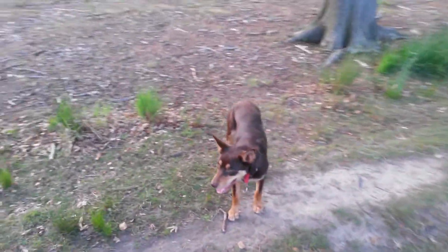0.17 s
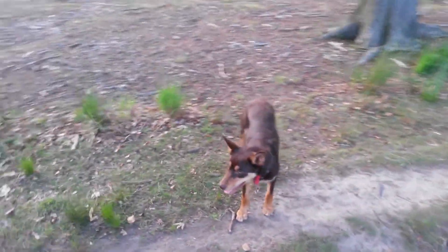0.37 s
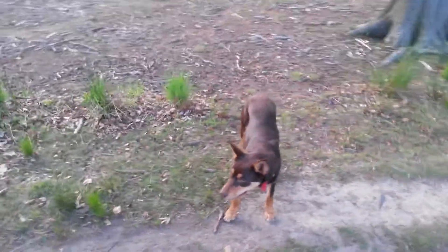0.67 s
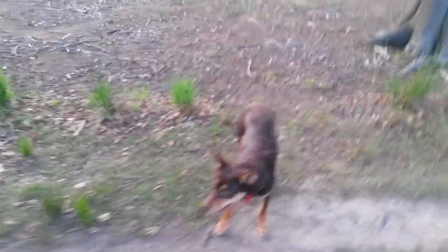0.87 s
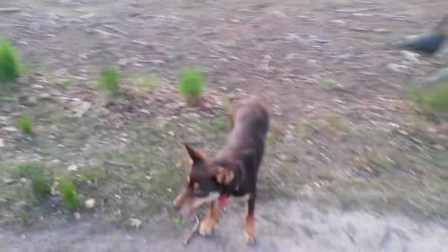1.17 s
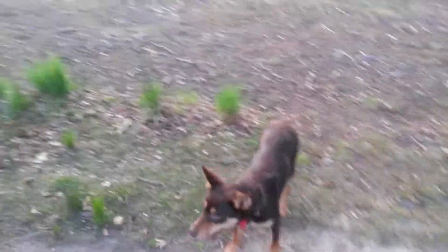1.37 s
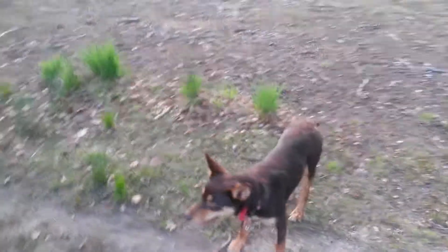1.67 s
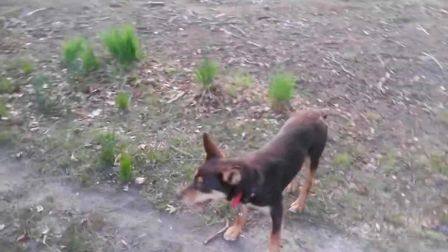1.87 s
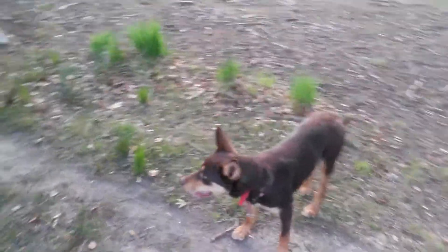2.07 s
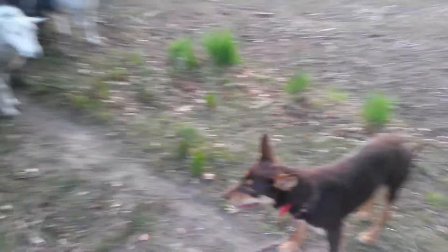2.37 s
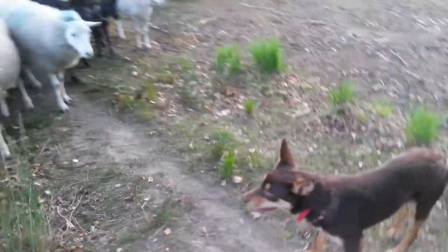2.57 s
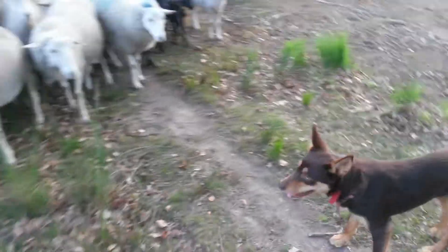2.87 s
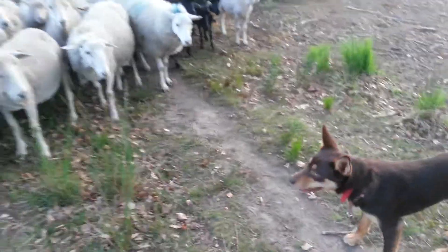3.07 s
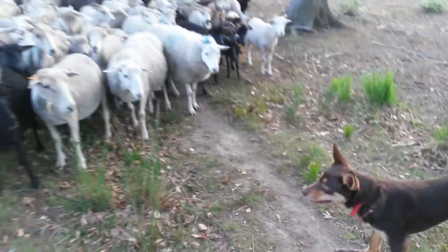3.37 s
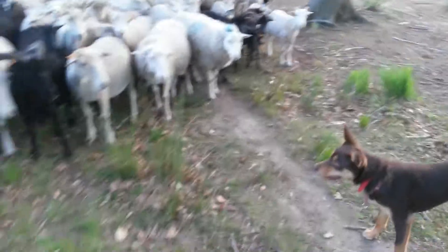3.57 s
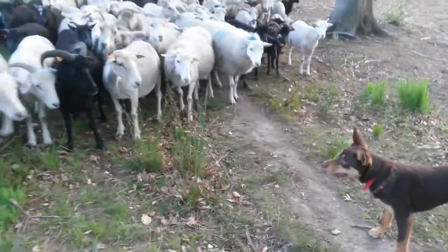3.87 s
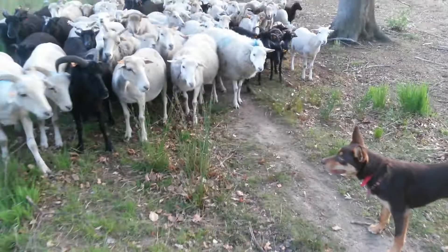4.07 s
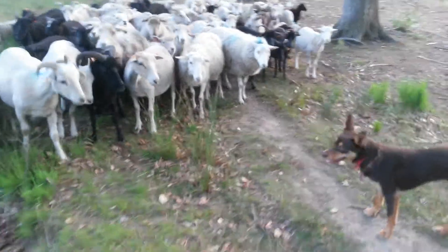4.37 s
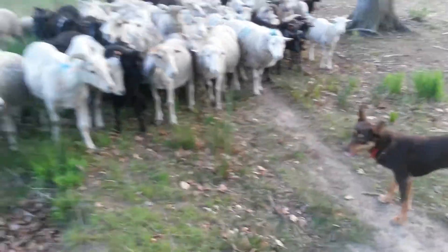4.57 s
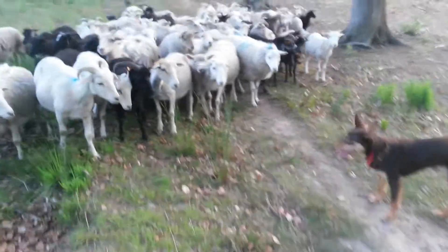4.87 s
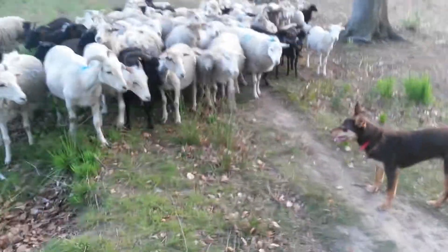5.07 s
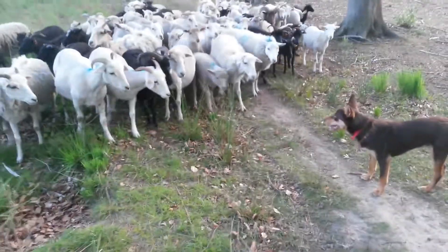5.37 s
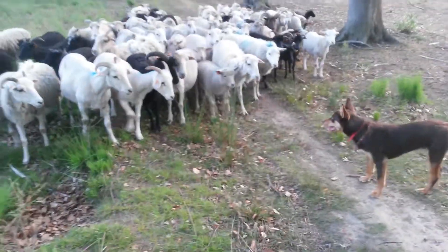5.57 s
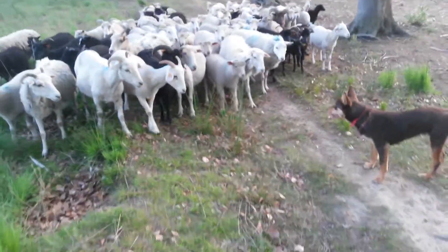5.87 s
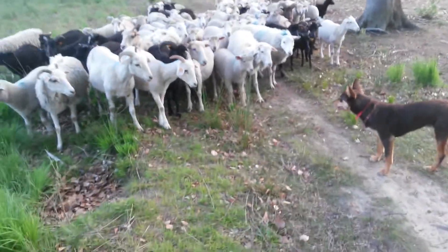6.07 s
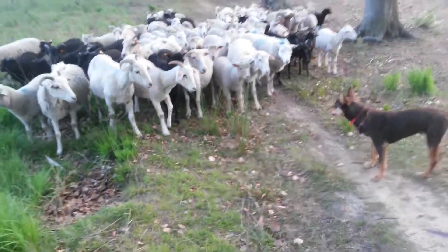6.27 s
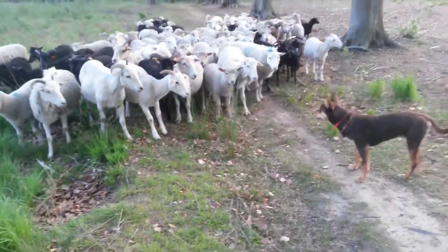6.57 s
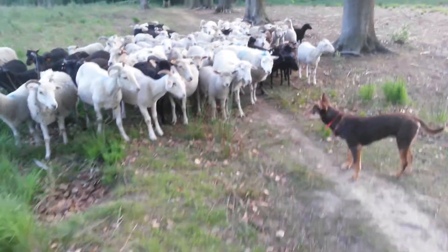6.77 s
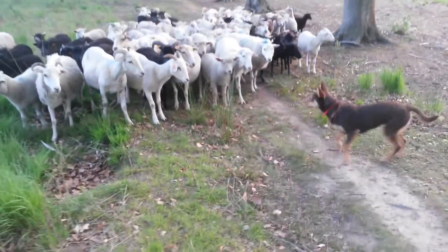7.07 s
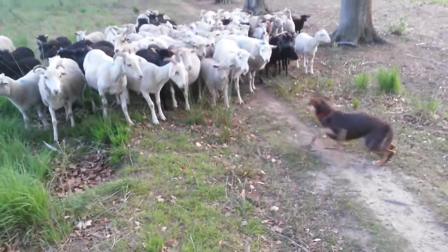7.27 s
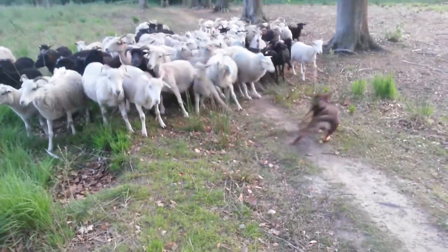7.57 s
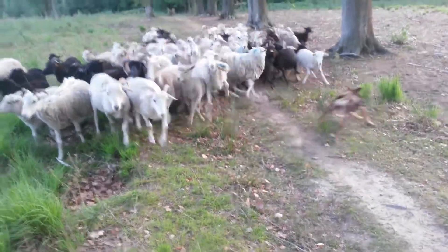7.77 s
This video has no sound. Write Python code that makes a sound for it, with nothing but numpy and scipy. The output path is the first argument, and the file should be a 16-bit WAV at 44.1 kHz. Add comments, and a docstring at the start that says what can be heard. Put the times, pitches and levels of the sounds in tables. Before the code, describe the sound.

Outdoors among trees, a flock treads on dry leaf litter: crackling rustle, sharp twig snaps, brief hoof scrapes and dull woody knocks. It starts busy and right-sided, then becomes sparse and more central as the microphone turns towards the animals. One sheep hums into a low trembling bleat, followed by tiny faint calls, a few hard knocks and a renewed rustle. A dim hush and low wind bumps lie beneath.

```python
"""On a woodland track a flock of sheep shuffles through dry leaves, heard at two microphone ports.
Leaves and twigs are noise bursts shaped by port resonances; scrapes are gliding noise bands, knocks damped modes.
One sheep hums, then gives a low, quavering bleat: harmonics through throat resonances. Faint calls,
soft blips, trampling and a breeze are tones, pulses and coloured noise. The camera turns to face the flock."""
import sys
import numpy as np
from scipy import signal
from scipy.fft import rfft, irfft
from scipy.io import wavfile
from scipy.ndimage import uniform_filter1d

SR = 44100
rng = np.random.default_rng(int(sys.argv[2]) if len(sys.argv) > 2 else 0)


def put_to_file(sound):
    """Save the sound as 16-bit audio at rate SR, in the file named by the first command-line argument."""
    columns = np.atleast_2d(sound).T  # one column per channel
    safe = np.clip(columns, -1, 1)
    whole_steps = np.round(safe * 32767)
    wavfile.write(sys.argv[1], SR, whole_steps.astype(np.int16))


N = 348831
TIME = np.arange(N) / SR
PORT_DELAY_S = .00043  # longest lag of the left port, for sound from the right

# direction of the flock, to the right of straight ahead: t/s, angle/rad
FLOCK_BEARING = [(0, 0.91), (.5, 1.04), (2.3, 1.16), (3.4, 1.03), (4.1, 0.77), (4.6, 0.24), (6.4, 0.21),
                 (7.91, 0.31)]


def gain_of(db):
    """Level law: converts decibels to an amplitude ratio."""
    return 10 ** (np.asarray(db) / 20)


def evened(x):
    """Normalisation: scales to an rms of one."""
    return x / np.sqrt(np.mean(x ** 2) + 1e-20)


def follow(rows, t=TIME):
    """Linear interpolation: the columns of a curve table at times t."""
    s, *columns = np.transpose(rows)
    return [np.interp(t, s, c) for c in columns]


def read(points, hz):
    """Interpolation of a spectrum table on a logarithmic frequency axis."""
    f, value = np.transpose(points)
    return np.interp(np.log(hz + 1), np.log(f + 1), value)


def add(mix, s, sound):
    """Superposition: mixes a sound in at time s."""
    part = mix[..., max(round(s * SR), 0):][..., :sound.shape[-1]]
    part += sound[..., :part.shape[-1]]


def coloured(x, db_at):
    """Minimum-phase filtering: a causal filter whose gain in dB is db_at(Hz)."""
    size = 4096
    log_gain = np.log(gain_of(db_at(abs(np.fft.fftfreq(size, 1 / SR)))))
    # the Hilbert transform of the log gain gives the phase
    response = np.exp(np.conj(signal.hilbert(log_gain)))
    taps = np.fft.ifft(response).real[..., :size // 2]
    return signal.oaconvolve(np.atleast_2d(x), np.atleast_2d(taps), axes=1)[:, :x.shape[-1]]


def wander(rate_hz, count=N):
    """Low-pass filtered noise: a smooth random drift of rms one."""
    hz = np.fft.rfftfreq(2 * N, 1 / SR)
    slow = rfft(rng.standard_normal(2 * N)) / (1 + (hz / rate_hz) ** 4)
    return evened(irfft(slow)[:count])


def grains(per_s, spread_db):
    """Random impulse train: clicks at chance instants, most small and a few large."""
    size = gain_of(spread_db * np.minimum(rng.exponential(1, N), 4.5))
    sign = rng.choice([-1, 1], N)
    return evened(size * sign * (rng.random(N) < per_s / SR))


def swells(rows):
    """Addition of power: smooth swells given as (t/s at the middle, level/dB, half-height length/s)."""
    power = np.zeros(N)
    for s, db, length in rows:
        add(power, s - length, gain_of(2 * db) * signal.windows.hann(int(2 * length * SR)))
    return power


def peaks(modes, hz):
    """Resonance: summed amplitude response of modes given as (f/Hz, width/Hz, level/dB)."""
    return sum(gain_of(db) / (1 + (2 * (hz - f) / width) ** 2) for f, width, db in modes)


def scattered(x, t60, wet_db):
    """Scattering: ground, legs and trunks return a short decaying tail, unlike at the two ports."""
    t = np.arange(SR // 4) / SR
    tail = rng.standard_normal((2, len(t))) * gain_of(-60 * t / t60)
    tail /= np.linalg.norm(tail, axis=1, keepdims=True)
    return x + gain_of(wet_db) * signal.oaconvolve(x, tail, axes=1)[:, :x.shape[1]]


def diffuse(clicks, t60, wet_db):
    """Diffuse decay: every click trails its own short puff of noise, unlike at the two ports."""
    r = np.exp(-2 * np.log(1000) / (t60 * SR))
    power = signal.lfilter([1 - r], [1, -r], clicks ** 2)
    return clicks + gain_of(wet_db) * np.sqrt(power) * rng.standard_normal(clicks.shape)


def dappled(x, depth_db, size, frames_count, bins_count, below_hz=np.inf):
    """Time-varying spectrum: brief random patches tint the sound, as no two leaves or footfalls are alike."""
    overlap = size * 3 // 4
    hz, _, z = signal.stft(x, SR, nperseg=size, noverlap=overlap)
    patches = uniform_filter1d(rng.standard_normal(z.shape[1:]), bins_count, axis=0)
    patches = uniform_filter1d(patches, frames_count, axis=1)
    tint_db = depth_db * evened(patches) / (1 + (hz[:, None] / below_hz) ** 2)
    tinted = signal.istft(z * gain_of(tint_db), nperseg=size, noverlap=overlap)[1]
    return evened(tinted[:, :N])


def leaf_db(hz):
    """Source and receiver: the spectrum of a breaking leaf plus the resonances of each port, in dB."""
    # spectrum of a breaking dry leaf: f/Hz, level/dB
    dry_leaf = [(100, -38), (300, -11), (700, -11.5), (1050, -10.5), (2000, -13.5), (3000, -7.5),
                (4000, -7.5), (5000, -3.5), (7500, -0.5), (9000, -1), (11000, -3), (14500, -7)]
    # resonances (dips if negative) of the left, then the right port: f/Hz, width/Hz, level/dB
    left_port = [(1708, 850, 12), (2220, 400, -7.5), (2710, 680, 5), (4360, 500, 0.5), (5570, 680, 5.5),
                 (7100, 1200, 11), (7980, 430, 3), (11400, 4000, -3), (12600, 1500, 0), (15000, 1400, -22)]
    right_port = [(1800, 4400, -5), (8200, 1980, 10.5)]
    ports = [sum(db / (1 + (2 * (hz - f) / width) ** 2) for f, width, db in port)
             for port in (left_port, right_port)]
    return read(dry_leaf, hz) + np.array(ports)


def crackle(per_s, spread_db, crush_db, flock_angle):
    """Fracture: a leaf gives way at once and crackles on briefly; cracks reach the left port later."""
    crushes_per_s, crush_decay_s = 260, .002
    crush_size = gain_of(crush_db * np.clip(rng.standard_normal(N), -2, 2))
    crushes = crush_size * (rng.random(N) < crushes_per_s / SR)
    crushing = signal.lfilter([1], [1, -np.exp(-1 / (crush_decay_s * SR))], crushes ** 2)
    # the constant keeps some cracks going between crushes
    cracks = grains(per_s, spread_db) * np.sqrt(crushing / crushing.mean() + 3.0)

    angle = follow(FLOCK_BEARING)[0] + flock_angle * rng.standard_normal(N)
    lag = np.round(PORT_DELAY_S * SR * np.sin(angle)).astype(int)
    arrival = np.clip(np.arange(N) + lag, 0, N - 1)
    pair = np.array([np.bincount(arrival, cracks, N), cracks])
    pair = diffuse(pair, t60=.022, wet_db=-5.5)
    return dappled(coloured(pair, leaf_db), depth_db=1.5, size=256, frames_count=10, bins_count=5)


def leaves():
    """Granular noise: steps swell out of the general rustle, with a coarser crunch in the heavy ones."""
    # steady shuffling of the restless flock: t/s, relative level/dB
    shuffling = [(0, -18), (.25, -20), (.34, -24), (.85, -28.5), (1.06, -30), (1.28, -29), (1.42, -27),
                 (1.95, -32.5), (2.15, -28), (2.9, -37.5), (3.6, -34), (4.2, -32.5), (4.9, -40), (5.1, -37),
                 (5.27, -35.5), (5.52, -26.5), (5.9, -42.5), (6.35, -38), (7.0, -46.5), (7.28, -40.5),
                 (7.5, -35), (7.91, -25)]
    # clearest steps: middle t/s, relative level/dB, half-height length/s, coarse part against level/dB
    steps = [(0.128, -16, 0.017, -8), (0.17, -29.5, 0.037, 18), (0.384, -16.5, 0.032, -19),
             (0.453, -16.5, 0.039, -25), (0.56, -21, 0.078, -15), (0.646, -14.5, 0.035, -5),
             (0.707, -17, 0.12, -5), (0.907, -21, 0.053, -12), (1.018, -21, 0.025, -10),
             (1.129, -18.5, 0.034, 1), (1.202, -18.5, 0.026, 1.5), (1.363, -20.5, 0.083, -17),
             (1.547, -17, 0.04, -13), (1.602, -24.5, 0.046, -9), (1.657, -22, 0.018, -10),
             (1.752, -21.5, 0.056, -8), (1.856, -21, 0.065, 5), (2.009, -22.5, 0.028, -3),
             (2.252, -19.5, 0.025, 5.5), (2.354, -26, 0.087, 6), (2.532, -25.5, 0.045, 3.5),
             (2.72, -27.5, 0.012, 5), (2.995, -29.5, 0.044, 6.5), (3.165, -29.5, 0.12, -13),
             (3.401, -28.5, 0.033, 5), (3.678, -28.5, 0.04, 0), (3.723, -22, 0.033, 3),
             (3.787, -26.5, 0.033, 4), (3.841, -22.5, 0.04, -4), (3.927, -26, 0.059, -4),
             (4.044, -24, 0.028, -16), (4.148, -21.5, 0.092, -15), (4.247, -29.5, 0.015, -5),
             (4.369, -21.5, 0.038, -16), (4.503, -30.5, 0.052, -2), (4.651, -29.5, 0.13, 10),
             (4.729, -28, 0.036, 4.5), (4.878, -32, 0.022, 5), (4.936, -30, 0.052, 7),
             (5.41, -25, 0.03, 7.5), (5.593, -38.5, 0.035, 17.5), (5.729, -40, 0.055, 15),
             (5.826, -35.5, 0.039, 6), (6.21, -31, 0.031, -2), (6.606, -24, 0.014, -13),
             (7.409, -25.5, 0.1, 4.5), (7.575, -27.5, 0.064, 4.5), (7.694, -25, 0.019, 2),
             (7.815, -23.5, 0.079, 2)]
    # shading of sound from the right, left minus right (applied at 95 %): f/Hz, level/dB
    shadow = [(1000, -9), (4000, -5.5), (7000, -8), (8500, -6.5), (11000, -15.5), (15000, -1)]
    crunch = [(150, -1), (500, -17.0), (1500, 4.5), (4500, 7.5), (6000, 1.0), (8000, -7), (15000, -8.5)]  # f/Hz, level/dB

    step_power = swells((s, db, length) for s, db, length, _ in steps)
    coarse_power = swells((s, db + coarse_db, length) for s, db, length, coarse_db in steps)
    shuffle = gain_of(follow(shuffling)[0] + 1.16 * wander(15.0))

    fine = crackle(per_s=6500, spread_db=2.0, crush_db=2.5, flock_angle=.18)
    fine *= np.sqrt(shuffle ** 2 + gain_of(-6.0) * step_power)
    coarse = crackle(per_s=6200, spread_db=2.0, crush_db=-2.0, flock_angle=.3)
    coarse = evened(coloured(coarse, lambda hz: read(crunch, hz)))
    rustle = fine + gain_of(-13.5) * coarse * np.sqrt(coarse_power + 4.4 * shuffle ** 2)
    tinted = dappled(rustle, depth_db=3.0, size=512, frames_count=8, bins_count=3, below_hz=4900)
    rustle = tinted * rustle.std()

    # side-on, the camera body shades the left port and lifts the treble at the right one
    side_on = coloured(rustle, lambda hz: read(shadow, hz) * np.array([[.7], [-.25]]))
    turned = np.sin(follow(FLOCK_BEARING)[0]) ** 2
    return (1 - turned) * rustle + turned * side_on


def twigs(crack=2.1, ring_db=10.5, ring_octaves=0.42):
    """Impulsive fracture: a crack and briefly tearing fibres, with a ring and more body in thick twigs."""
    # snaps: t/s, level over 4 ms/dB, left minus right/dB, woody body below 5.5 kHz/dB,
    # tearing decay/s, ring f/Hz
    snaps = [(0.2657, -20, 7, 5, .0004, 6600), (0.293, -17, -4, 8, 0.00042, 7050),
             (.303, -17, 3, 7, .0006, 7000), (0.33, -26, 6, 3, .0004, 7200),
             (.337, -19.5, 0, 14, 0.00062, 6640), (0.527, -22.5, -10, -10, .0008, 7240),
             (.7122, -20.5, -6, 2, .0005, 6300), (.8877, -22, -10, -2, .0022, 7400),
             (.9672, -27, -10, -4, .0006, 8200), (.9928, -29, -14, -9, .0002, 12000),
             (1.0166, -26, -5, 0, .0006, 6600), (1.0645, -16.5, -3, 8, .0009, 6200),
             (1.2152, -28, -10, -6, .0003, 8200), (1.2417, -20.5, -3, 2, .0018, 9500),
             (1.2544, -20.5, -6, -4, .0005, 6800), (1.258, -21, -5, -8, .0004, 7700),
             (1.263, -19, -5, -8, .003, 7000), (1.2836, -21.5, -9, -8, .0009, 9700),
             (1.4547, -26, -10, -4, .0005, 8000), (1.524, -31, -10, -6, .0004, 9300),
             (1.86, -26, 3, -6, .0004, 6000), (1.970, -28, -4, -6, .0003, 7800),
             (2.1947, -24, 1, 2, .0014, 7000), (2.248, -23, -8, -3, .0008, 8000),
             (2.5735, -29, -6, -2, .0006, 7200), (2.6811, -15, 10, -10, .00022, 5400),
             (2.6844, -29.5, 3, -2, .0003, 6500), (2.757, -35, -8, -6, .0004, 8400),
             (2.8465, -32, -13, -6, .0003, 8800), (2.8675, -21.5, 1, 13.5, 0.00086, 7700),
             (2.9175, -29.5, -1, 14, 0.0015, 7040), (3.725, -28.5, -12, -9, 0.00044, 8600),
             (4.021, -25, -2, -8, .002, 7270), (4.028, -23, -5, -10, 0.003, 7200),
             (4.0341, -20.5, 0, -4, 0.00088, 7500), (4.256, -28, 0, 0, .001, 7200),
             (4.478, -31.5, 5, -2, .0007, 6600), (4.8588, -30, -5, -4, .0005, 9500),
             (4.862, -27, -5, 0, .0006, 7160), (4.8759, -30.5, -7, -3, .0002, 9500),
             (5.0252, -27, 2, 1, 0.0017, 6700), (5.0325, -27, -2, 2, 0.003, 8000),
             (5.116, -21.5, 0, 10, .0007, 6300), (5.2463, -31, -6, -2, .0004, 7200),
             (5.2764, -27, -7, -7, .001, 11000), (5.8215, -31, 0, -2, .0007, 7600),
             (5.9375, -35, 0, 6, .0012, 8000), (6.1933, -28, -2, 4, 0.00072, 7400),
             (6.557, -26, 0, -3, .0011, 6100), (6.601, -24, -4, 8, 0.0027, 10100),
             (6.7467, -36.5, 1, 13, .0011, 6700), (7.2343, -31.5, 2, 24, .0012, 6500),
             (7.2863, -34, 0, 12, .001, 7200), (7.6928, -24.5, -2, -4, .0007, 7300)]
    out, t = np.zeros((2, N)), np.arange(3000) / SR
    left_lag, level_span = round(PORT_DELAY_S * SR * .6), .004 * SR  # samples
    for s, db, pan_db, body_db, tear_s, ring_hz in snaps:
        fibres = rng.standard_normal((2, len(t))) * np.exp(-t / tear_s)
        fibres[:, 0] = crack
        fibres[0] = np.roll(fibres[0], left_lag)

        def snap_db(hz):
            """Spectral envelope: sum of leaf-like colour, ring and body in dB."""
            ring = ring_db * np.exp(-(np.log2((hz + 1) / ring_hz) / ring_octaves) ** 2)
            return 0.73 * leaf_db(hz) + ring + body_db / (1 + (hz / 5500) ** 4)

        snap = coloured(fibres, snap_db)
        snap *= np.sqrt(level_span) / np.linalg.norm(snap, axis=1, keepdims=True)
        add(out, s, snap * gain_of(db + np.array([[pan_db], [-pan_db]]) / 2))
    return scattered(out, t60=0.091, wet_db=-10)


def scrapes():
    """Friction noise: a hoof dragging through leaves hisses in one narrow, gliding band."""
    # drags: start t/s, end t/s, start f/Hz, end f/Hz, half-width/Hz, level/dB
    drags = [(0.24, 0.287, 4770, 5100, 140, -29), (1.843, 1.873, 4700, 4130, 500, -24),
             (1.986, 2.02, 5100, 4630, 300, -37), (2.011, 2.118, 3800, 4230, 400, -34.5),
             (2.061, 2.128, 2640, 2470, 80, -42), (2.078, 2.123, 4720, 5120, 120, -32.5)]
    out = np.zeros((2, N))
    for start, end, start_hz, end_hz, width_hz, db in drags:
        count = max(int((end - start) * SR), 100)
        # low-pass noise, shifted up to the gliding centre frequency
        turn = np.exp(2j * np.pi * np.cumsum(np.linspace(start_hz, end_hz, count)) / SR)
        noise = rng.standard_normal((2, count)) + 1j * rng.standard_normal((2, count))
        band = signal.lfilter(*signal.butter(2, width_hz, fs=SR), noise)
        add(out, start, gain_of(db) * evened((band * turn).real) * signal.windows.tukey(count, .7))
    return out


def hooves():
    """Modal vibration: each hard knock starts bright, as its high modes sound first, and sinks into low ones."""
    # knocks: t/s, peak level/dB, pitch factor, brightness per two octaves above 420 Hz/dB
    knocks = [(.734, -23, 1.22, 0), (0.745, -23, 0.95, 6), (0.786, -31, .96, -8), (0.824, -33, 0.87, -11),
              (.854, -31, 0.91, 3), (0.917, -31.5, 1.02, -8), (.993, -28.5, 0.65, 13),
              (1.21, -27, 0.96, -6), (1.76, -26, 2.17, -20), (1.781, -24.5, 2.47, -17),
              (1.785, -23, 0.94, -5), (1.952, -31, 0.43, 0), (2.192, -28, 1.1, 8), (2.351, -24, 0.94, 3),
              (2.866, -27, 1.03, 3.5), (4.1, -29, 1.7, -18), (4.118, -32.5, 1.04, -4),
              (4.913, -33.5, 0.82, -6), (5.408, -21.5, 1.98, 0), (5.451, -28.5, 1.44, -12),
              (5.716, -31, 1.75, -20), (5.763, -36, 0.32, 2), (5.817, -35.5, 0.365, -14),
              (6.327, -33.5, 0.7, -1), (6.3542, -22, 0.97, 2), (6.3718, -20, 1.1, 1),
              (6.3945, -24, 1.07, -3), (6.601, -25, 1.5, 2.5), (6.829, -31.5, 1.2, 6),
              (7.479, -32, 0.73, 2), (7.491, -28, 0.93, 25), (7.612, -32, 0.55, -17),
              (7.785, -34, 1.43, -9)]
    # modes at a pitch factor of one and neutral brightness: f/Hz, width/Hz, level/dB
    knock_modes = [(400, 151, 6), (743, 187, 2), (1140, 164, -5.5), (1490, 186, -2), (2710, 270, -12.5)]
    sag_cycles = 1.1  # each mode starts this many of its own cycles late
    out, t = np.zeros(N), np.arange(2500) / SR
    for s, db, pitch, bright_db in knocks:
        knock = np.zeros(len(t))
        for hz, width, mode_db in knock_modes:
            f = hz * pitch * rng.uniform(1.0, 1.05)
            age = np.maximum(t - sag_cycles / f, 0)
            envelope = np.exp(-np.pi * width * age) * (1 - np.exp(-age * f))
            gain = gain_of(mode_db + bright_db * np.log2(hz / 420) / 2)
            knock += gain * np.sin(2 * np.pi * f * age) * envelope
        add(out, s, gain_of(db) * knock / abs(knock).max())
    return scattered(np.array([out, out]), t60=0.11, wet_db=-15)


def bleat(depth=0.66, swell_db=4.0, sag=0.027, catch_sag=0.0121, rasp_db=-17):
    """Source-filter voice: hums open into a held call whose level and pitch quaver as the throat catches."""
    # throat resonances: f/Hz, width/Hz, level/dB
    throat = [(660.5, 90, 9.5), (1630, 170, -2), (2790, 300, -6.5), (3380, 300, -11), (5570, 300, -3)]
    # swells of the closed-mouth hum: middle t/s, level/dB, half-height length/s
    hums = [(5.035, -52.5, 0.047), (5.155, -45.5, 0.049), (5.23, -47.5, 0.029), (5.315, -47, 0.031)]
    # pitch before jitter and quaver: t/s, f/Hz
    pitch = [(5.01, 176), (5.07, 146.6), (5.16, 184.8), (5.235, 179), (5.33, 158.7), (5.39, 168.9),
             (5.45, 168.3), (5.55, 164.8), (5.68, 161.7), (5.73, 156)]
    hum_s, open_s, end_s = 5.0, 5.285, 5.724  # the hum starts, the mouth opens, the call ends
    opening_s, edge_s = .1, .018  # mouth-opening time; fade at either end
    quaver_hz, catch_s = 13.6, 5.579  # rate of the catches, and the time of one of them
    call_db, fade_db_per_s = -35.5, 3
    chest_db, hum_db = -54, -61  # hum under the open call, and between the swells
    call_rough, call_jitter, hum_rough, hum_jitter = .18, .0045, .4, .04  # rms, relative

    t = np.arange(hum_s, end_s, 1 / SR)
    mouth = np.clip((t - open_s) / opening_s, 0, 1)
    cycle = quaver_hz * (t - catch_s) % 1
    catch = np.cos(np.pi * cycle) ** 10
    push = -np.sin(2 * np.pi * cycle) / 2
    jitter = call_jitter * wander(68, count=len(t))
    jitter += (1 - mouth) * hum_jitter * wander(29.3, count=len(t))
    hz = follow(pitch, t)[0] * (1 + jitter - mouth * (sag * push + catch_sag * catch))

    order = np.arange(1, 38)[:, None]
    partials = np.sin(2 * np.pi * order * np.cumsum(hz) / SR)
    call = evened((partials * (peaks(throat, order * hz) + gain_of(-46) / np.sqrt(order))).sum(0))
    # half the throat's gain in dB colours the rasp
    rasp = coloured(rng.standard_normal(len(t)), lambda f: 10 * np.log10(peaks(throat, f)))[0]
    call += gain_of(rasp_db) * evened(rasp)
    voicing = mouth * (1 - depth * catch)
    call *= voicing * gain_of(call_db + swell_db * push - fade_db_per_s * (t - open_s))
    call *= 1 + call_rough * wander(114, count=len(t))

    hum_power = gain_of(2 * hum_db) + (voicing * gain_of(chest_db)) ** 2 + np.interp(t, TIME, swells(hums))
    hum = evened((partials / order ** 2).sum(0) * (1 + hum_rough * wander(25, count=len(t))))
    hum *= np.sqrt(hum_power)

    out = np.zeros(N)
    add(out, hum_s, (call + hum) * np.minimum(np.minimum(t - hum_s, end_s - t) / edge_s, 1))
    return scattered(np.array([out, out]), t60=0.2, wet_db=-20) * gain_of([[.5], [-.5]])


def blips():
    """Amplitude-modulated tones: brief, soft, slightly hoarse blips from the flock that sag a little."""
    # tones: middle t/s, f at the middle/Hz, length/s, peak level before roughening/dB
    tones = [(0.023, 170, 0.036, -47), (0.095, 210, 0.044, -43), (2.11, 1016, 0.068, -42),
             (3.228, 244, 0.06, -43), (3.301, 875, 0.052, -43.5), (5.036, 966, 0.012, -28.5),
             (6.616, 238, 0.037, -35)]
    out, rough = np.zeros(N), .15
    for s, hz, length, db in tones:
        u = np.linspace(-.5, .5, int(length * SR))
        phase = 2 * np.pi * np.cumsum(hz * (1 - 0.025 * u)) / SR
        add(out, s - length / 2, gain_of(db) * np.cos(np.pi * u) ** 2 * np.sin(phase))
    out *= (1 + rough * wander(100)) / np.sqrt(1 + rough ** 2)
    return scattered(np.array([out, out]), t60=0.058, wet_db=-12.0)


def far_calls(rough=0.44, sag=0.06):
    """Source-filter voice: faint, hoarse pulses from the back of the flock through throat resonances."""
    # short calls: middle t/s, length/s, pitch f at the middle/Hz, level before the fades/dB
    calls = [(5.231, 0.035, 258, -41), (6.049, 0.055, 253, -44.5), (6.137, 0.038, 238, -49)]
    # throat resonances: f/Hz, width/Hz, level/dB
    far_throat = [(790, 380, 2), (2480, 220, 2), (4500, 360, -3)]
    out = np.zeros(N)
    for s, length, pitch_hz, db in calls:
        u = np.linspace(-.5, .5, int(length * SR))
        # one pulse at each completed cycle
        pulses = np.diff(np.floor(np.cumsum(pitch_hz * (1 - sag * u)) / SR), prepend=0)
        drive = evened(pulses - pulses.mean()) + rough * rng.standard_normal(len(u))
        voice = coloured(drive, lambda hz: 20 * np.log10(peaks(far_throat, hz)))[0]
        add(out, s - length / 2, gain_of(db) * evened(voice) * np.cos(np.pi * u))
    return scattered(np.array([out, out]), t60=0.18, wet_db=-7.0)


def trample():
    """Random superposition: many small footfalls on bare earth, nearly alike at both ports."""
    # soft trampling: t/s, level/dB
    trample_level = [(0, -66), (.6, -50), (.85, -43.5), (1.35, -51), (1.9, -45), (3.1, -57), (4.2, -45),
                     (4.6, -51), (5.75, -49.5), (6.0, -51.5), (7.2, -56), (7.55, -46), (7.91, -38)]
    # its spectrum: f/Hz, relative level/dB
    earth_colour = [(40, -43), (90, -7), (190, 3), (330, -0.5), (480, -2.5), (700, -1.5), (1100, -8),
                    (2500, -7.5), (6000, -63)]
    feet = grains(per_s=1100, spread_db=3.0) * gain_of(2.33 * wander(18.7))
    thuds = diffuse(np.array([feet, feet]), t60=0.1, wet_db=-6)
    thuds = coloured(thuds, lambda hz: read(earth_colour, hz))
    thuds = dappled(thuds, depth_db=4.0, size=1024, frames_count=6, bins_count=4)
    return thuds * gain_of(follow(trample_level)[0])


def air():
    """Flow noise: a lumpy low-frequency breeze at the ports over the far hush of the wood."""
    # steady air over the ports, before the port balance: t/s, level/dB
    breeze = [(.17, -83), (.28, -54.5), (2.2, -51.5), (3.1, -63.5), (5.2, -57.5), (7.91, -50.5)]
    # puffs that bump the ports, before the port balance: middle t/s, level/dB
    puffs = [(1.0, -49), (1.97, -50), (2.36, -47), (5.13, -49.5), (5.62, -45), (5.79, -43), (6.262, -47),
             (6.63, -46), (6.92, -47), (7.17, -49), (7.33, -49)]
    # spectra of the breeze and of the far hush: f/Hz, relative level/dB
    breeze_colour = [(10, -26), (30, -3.5), (55, 1), (110, 4), (170, -6.5), (300, -15), (1000, -41)]
    wood_colour = [(30, -37), (120, -7), (400, -0.5), (1600, 6), (4000, 8.5), (9000, -22), (15000, -31)]
    puff_s = 0.061  # rise time, and fall time
    # a shared noise makes the two ports partly alike
    flow = rng.standard_normal((2, N)) + 0.96 * rng.standard_normal(N)
    flow *= gain_of(2.0 * np.array([wander(8.7), wander(11.0)]))
    strength = np.sqrt(gain_of(2 * follow(breeze)[0]) + swells((s, db, puff_s) for s, db in puffs))
    rumble = evened(coloured(flow, lambda hz: read(breeze_colour, hz)))
    rumble = rumble * strength * gain_of([[-1.5], [1.]])
    hush = rng.standard_normal((2, N)) + 0.19 * rng.standard_normal(N)
    hush = evened(coloured(hush, lambda hz: read(wood_colour, hz)))
    return rumble + gain_of(-54) * hush


def scene():
    """Linear superposition: all sources at the two ports."""
    return (leaves() + twigs() + scrapes() + hooves() + bleat()
            + blips() + far_calls() + trample() + air())


def record(dry):
    """Saturation and band limiting: peaks clip at full scale, then a low-pass filter trims the top."""
    edge_hz = 14750
    low_pass = signal.firwin(401, edge_hz, window=("kaiser", 8), fs=SR)
    return signal.oaconvolve(np.clip(dry, -1, 1), low_pass[None], "same", axes=1)


dry = scene()
out = record(dry)
put_to_file(out)
```